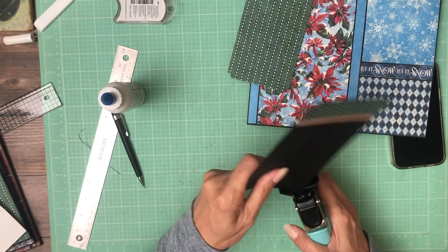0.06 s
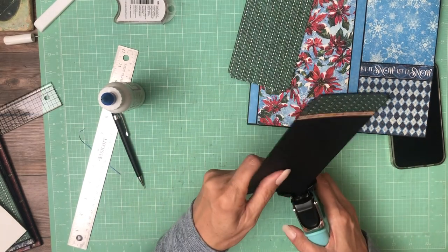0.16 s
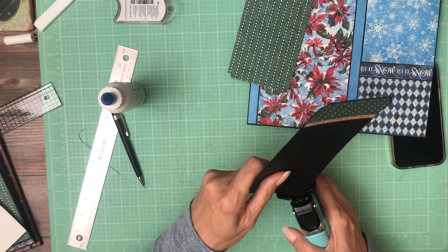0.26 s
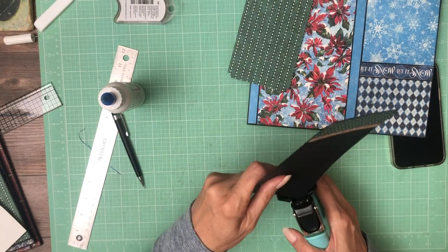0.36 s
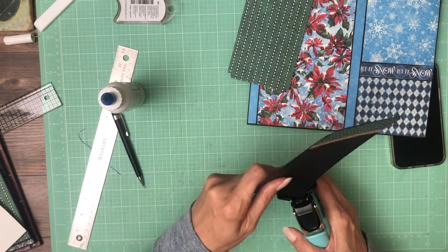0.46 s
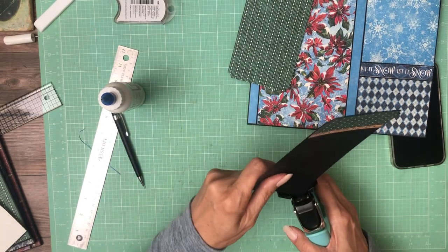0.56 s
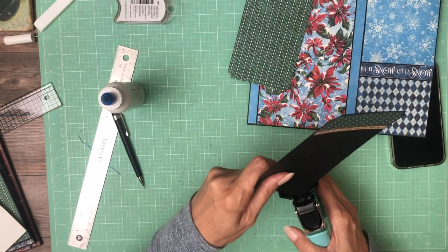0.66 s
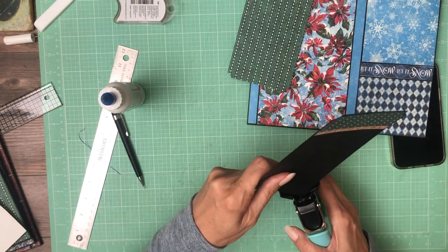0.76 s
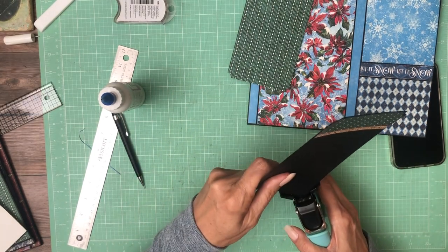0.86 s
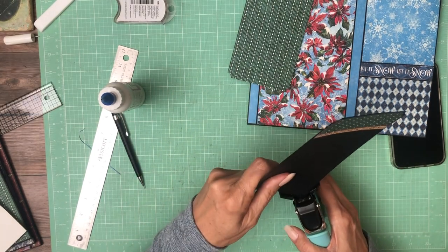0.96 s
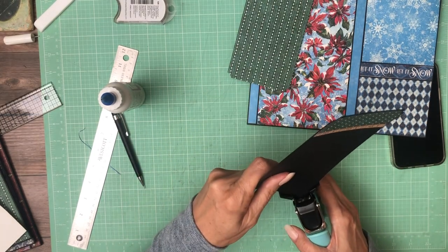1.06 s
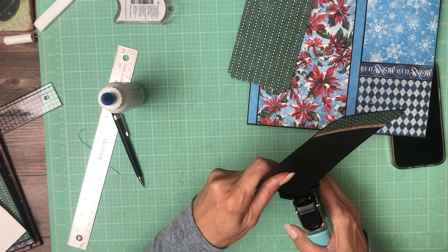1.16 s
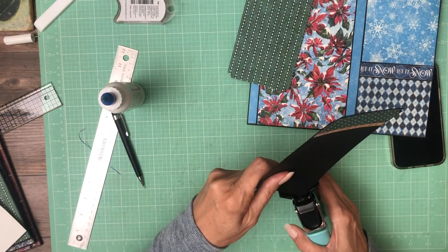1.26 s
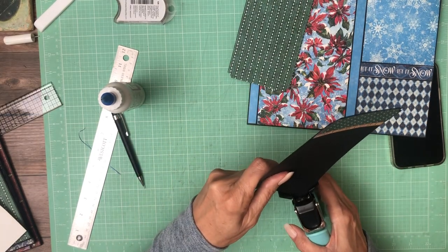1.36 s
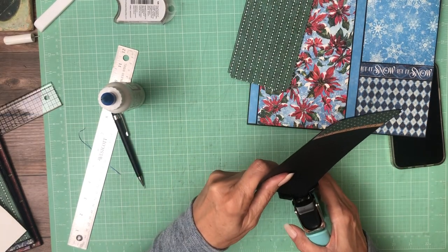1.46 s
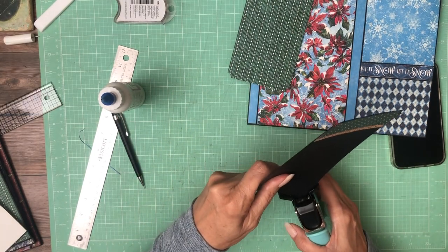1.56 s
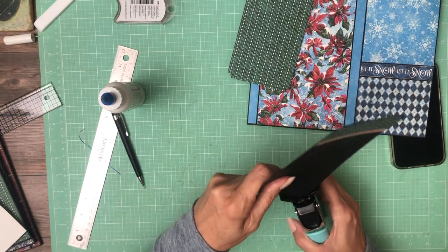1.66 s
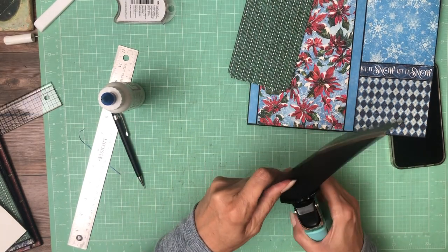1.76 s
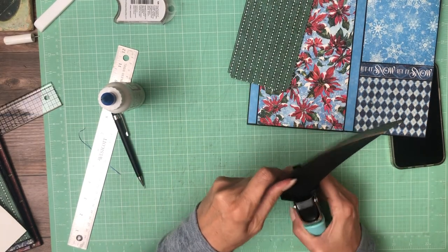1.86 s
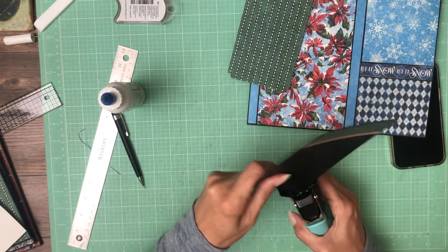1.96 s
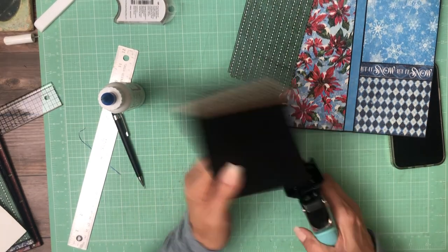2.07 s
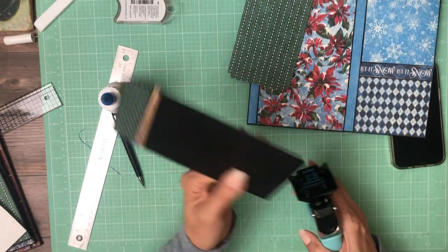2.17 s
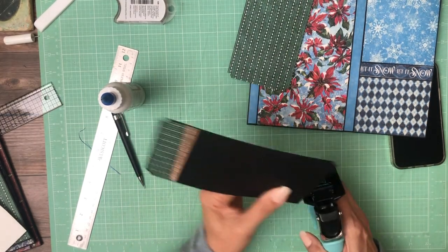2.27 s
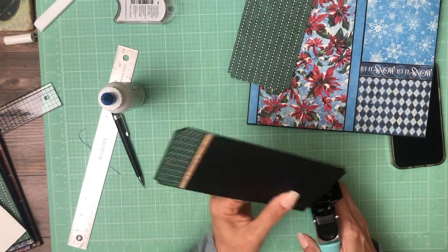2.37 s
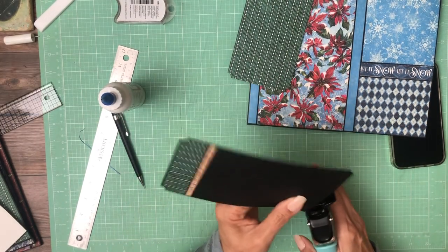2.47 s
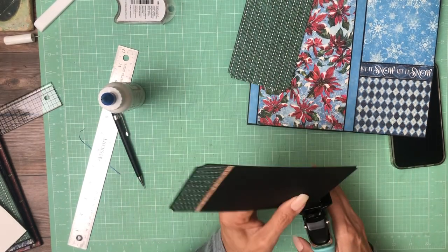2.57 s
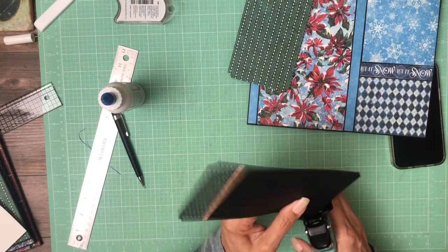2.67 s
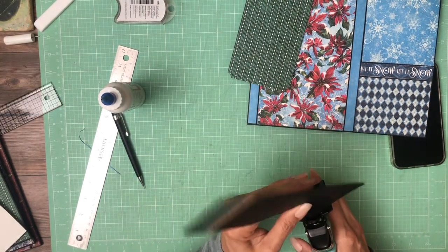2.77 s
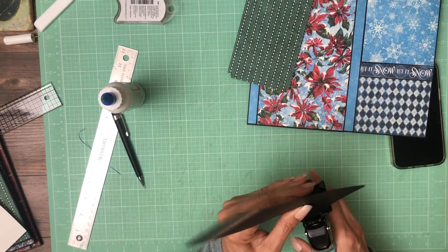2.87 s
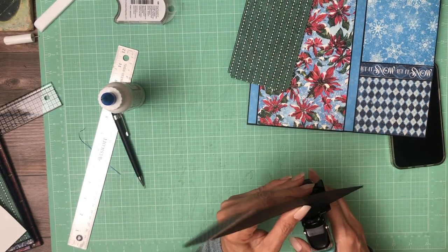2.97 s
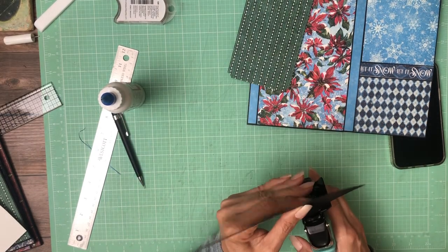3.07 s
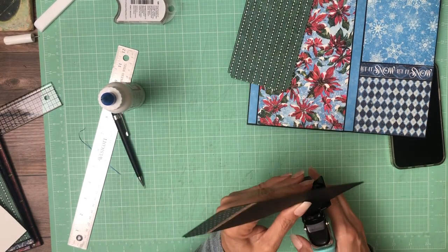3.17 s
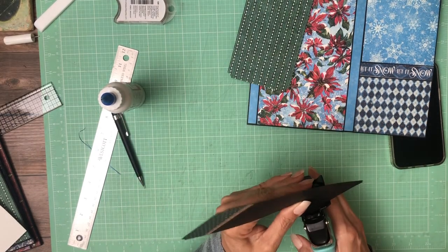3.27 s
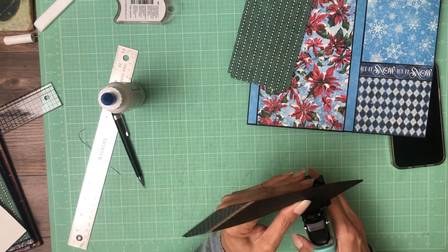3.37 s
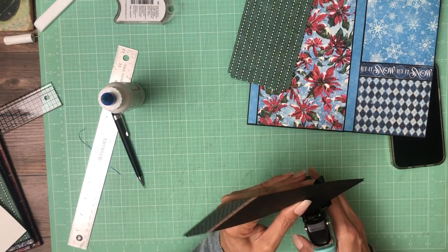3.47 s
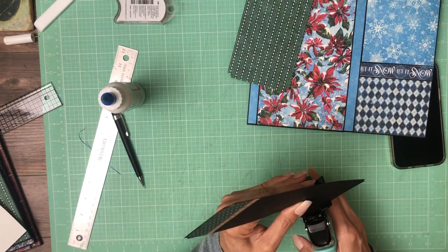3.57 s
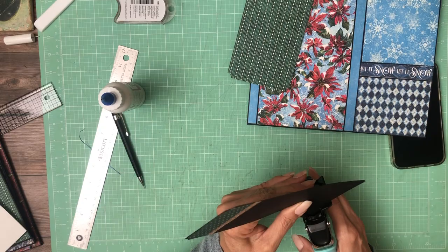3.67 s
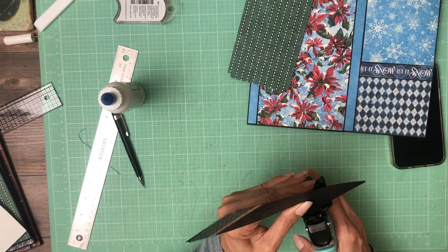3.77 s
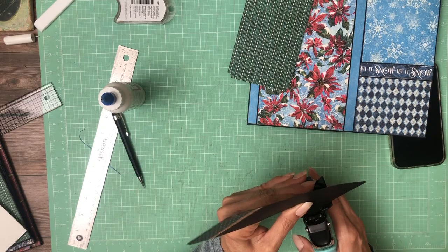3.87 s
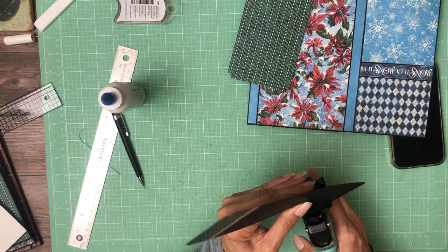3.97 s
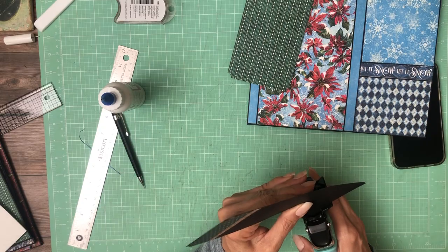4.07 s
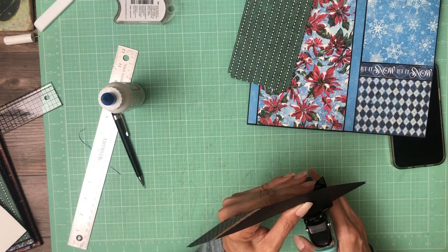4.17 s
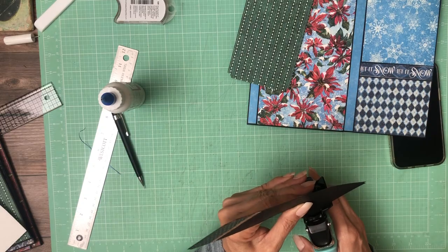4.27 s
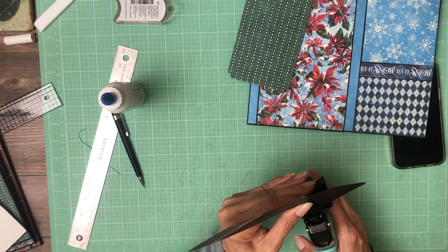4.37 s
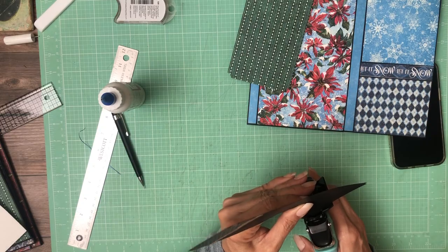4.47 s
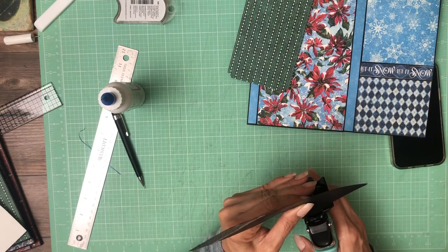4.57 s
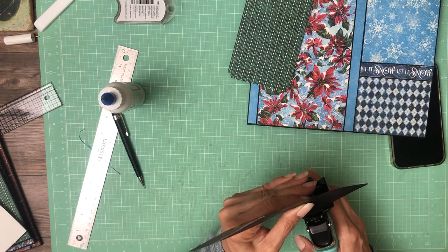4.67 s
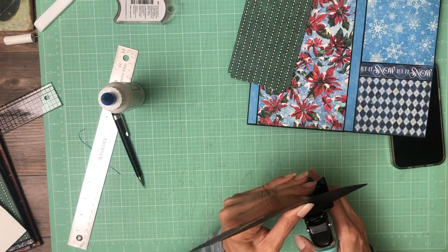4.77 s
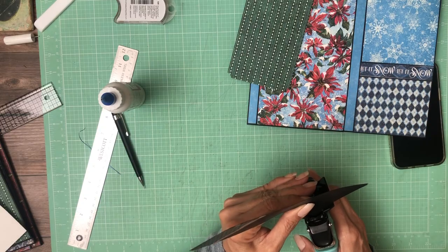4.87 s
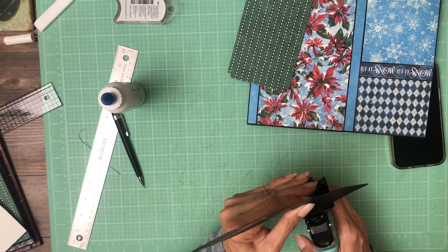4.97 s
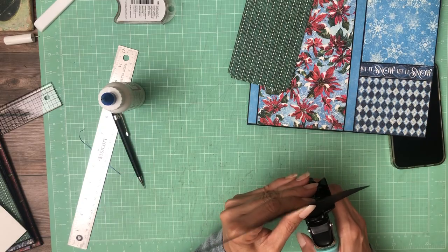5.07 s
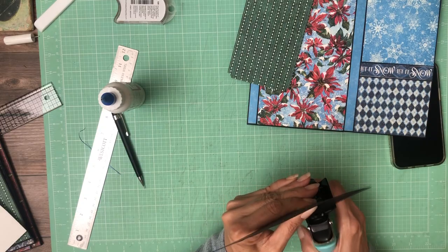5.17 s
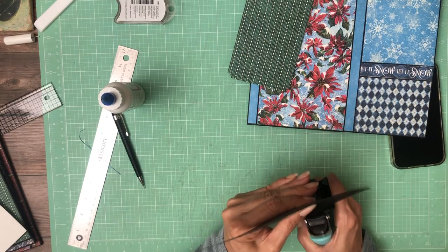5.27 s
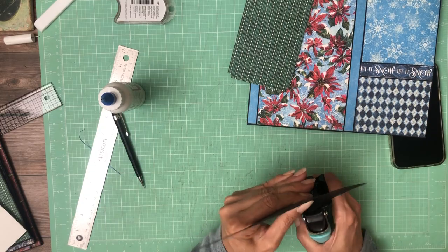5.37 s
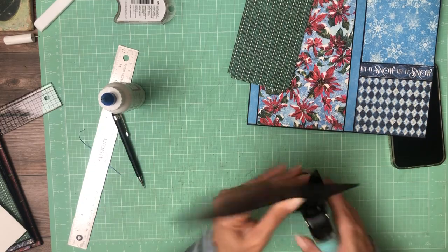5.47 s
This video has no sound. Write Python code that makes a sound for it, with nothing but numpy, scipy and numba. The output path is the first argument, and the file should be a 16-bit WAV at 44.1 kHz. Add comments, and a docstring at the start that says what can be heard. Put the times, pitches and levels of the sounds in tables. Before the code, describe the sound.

Close, dry sound at a craft desk. Faint ticks of a card edge in a metal slot, then a hand punch crunches through cardstock with a dull spring-back thud. The card scrapes and clicks as it is turned, near-silence follows, and a second, louder crunch ends it.

```python
"""A hand punch trims the corner of a stiff card in two squeezes: torn fibres, as random snaps, ring the jaws and hiss.
Jaws and card edge click as short rough contacts ringing metal resonances; the card scrapes in the slot as
filtered grain noise. Card and handle thud and flap as damped bending modes, over a short dull room tail
and a faint hush of shaped noise with a far motor's hum."""
import sys
import numpy as np
from scipy import signal
from scipy.fft import rfft, irfft, next_fast_len
from scipy.io import wavfile
from scipy.ndimage import uniform_filter1d
from numba import njit

SR = 44100
rng = np.random.default_rng(int(sys.argv[2]) if len(sys.argv) > 2 else 0)


def boost_factor(decibels):
    """Convert a level in decibels to a linear amplitude factor."""
    exponent = np.asarray(decibels, float) / 20
    return 10 ** exponent


def bounce(signal):
    """Save signal as a 16-bit WAV file at the path given by the first command-line argument."""
    frames = np.transpose(np.atleast_2d(signal))
    limited = np.clip(frames, -1, 1)
    pcm = np.round(limited * 32767).astype(np.int16)
    wavfile.write(sys.argv[1], SR, pcm)


N = 243431
T = np.arange(N) / SR

# jaw resonances: f/Hz, width/Hz, gain/dB
JAW_RINGS = [(1061, 53, -1.5), (1297, 68, -2), (1590, 90, 4), (2500, 210, 3), (2840, 340, 9),
             (3290, 150, -11), (4230, 410, -9), (6124, 900, -4)]
# slot resonances: f/Hz, width/Hz, gain/dB
SLOT_RINGS = [(1671, 150, 7.5), (2300, 590, -7.5), (3190, 220, 0), (3760, 130, 1.5), (4100, 160, -4.5),
              (5050, 140, 3.5), (6630, 410, -9), (7030, 102, 7), (7670, 169, -4), (9000, 400, -4.5)]


def level(x, db=0):
    """Scale to an rms level."""
    return x * boost_factor(db) / np.sqrt(np.mean(x ** 2))


def peak(x, db):
    """Scale to a peak level."""
    return x * boost_factor(db) / np.abs(x).max()


def add(out, start_s, sound):
    """Mix a sound in at a time."""
    i = int(start_s * SR)
    out[i:i + len(sound)] += sound[:N - i]


def band(x, lo_hz, hi_hz):
    """Steep fixed band-pass."""
    edges_hz = [lo_hz, min(hi_hz, 0.45 * SR)]
    return signal.sosfilt(signal.butter(3, edges_hz, "bandpass", fs=SR, output="sos"), x)


def colour(x, points):
    """Shape the spectrum by (f/Hz, gain/dB) points, interpolated over log frequency."""
    hz, db = np.transpose(points)
    n = next_fast_len(len(x))
    f_hz = np.maximum(np.arange(n // 2 + 1) * SR / n, 1)
    gain = boost_factor(np.interp(np.log(f_hz), np.log(hz), db))
    return irfft(rfft(x, n) * gain, n)[:len(x)]


def ring(x, modes):
    """Sum of fixed resonances with alternating sign."""
    out = 0
    for k, (hz, width_hz, db) in enumerate(modes):
        b, a = signal.iirpeak(hz, hz / width_hz, SR)
        out = out + (-1) ** k * boost_factor(db) * signal.lfilter(b, a, x)
    return out


@njit
def sweep(x, hz, share):
    """Band-pass whose centre moves; width is a share of the centre."""
    y, band_state, low_state = np.empty(len(x)), 0., 0.
    for i in range(len(x)):
        g = np.tan(np.pi * hz[i] / SR)
        v = (band_state + g * (x[i] - low_state)) / (1 + g * (g + share))
        band_state = 2 * v - band_state
        low_state += 2 * g * v
        y[i] = share * v
    return y


def walk(size):
    """Smooth random drift over about size samples; rms 1."""
    return level(uniform_filter1d(uniform_filter1d(rng.standard_normal(N), size), size))


def fibres(rate_hz, spread_db, patchy_db):
    """Fibres snap at random, in louder and softer patches of some ms; spread makes a few snap harder."""
    snaps = (rng.random(N) < rate_hz / SR) * rng.standard_normal(N)
    snaps = snaps * boost_factor(spread_db * rng.exponential(size=N))
    return level(snaps * boost_factor(patchy_db * np.tanh(walk(size=150))))


def curves(gestures):
    """Gate and columns over time; silent between separate gestures, bridged over short pauses."""
    on = np.zeros(N)
    s, *columns = np.vstack(gestures).T
    for rows in gestures:
        on[int(rows[0][0] * SR):int(rows[-1][0] * SR) + 450] = 1
    return uniform_filter1d(on, size=200), [np.interp(T, s, c) for c in columns]


def held(gestures, rows):
    """Columns of one row per gesture, held from the gesture's start."""
    starts_s = [gesture[0][0] for gesture in gestures]
    k = np.maximum(np.searchsorted(starts_s, T) - 1, 0)
    return np.array(rows, float).T[:, k].copy()


def contact(push_s, drag_db):
    """A short rough contact force, then the edge drags a little."""
    t = T[:4000]
    push = t / push_s * np.exp(-t / push_s)
    drag = boost_factor(drag_db) * np.exp(-t / 0.0072)
    return rng.standard_normal(4000) * (push + drag)


def favour(hz, spot_hz):
    """Gain in dB of a mode: 0 at the pitch the contact favours, down to -14 at 0.4 octave and beyond."""
    return -14 * np.minimum(np.abs(np.log2(hz / spot_hz)) / 0.4, 1)


def decay(modes, rise_s):
    """Damped sines (f/Hz, level/dB, t60/s) with a rounded start."""
    t = T[:SR // 2]
    sound = sum(boost_factor(db) * np.sin(2 * np.pi * hz * t) * 1000 ** (-t / t60_s) for hz, db, t60_s in modes)
    return sound * np.sin(np.pi / 2 * np.minimum(t / rise_s, 1)) ** 2


def cuts():
    """Tearing fibres ring the jaws, hiss into the air and shake the card."""
    # bite, shear and opening of each squeeze: t/s, level/dB, low jaw ring/dB re level, fibre hiss/dB re level
    phases = [
        [(1.69, -70.5, -8, -9.5), (1.724, -59.5, -4, -14.5), (1.728, -45.5, -34, -17), (1.763, -34.5, -29, -14),
         (1.769, -37.5, -23, -10.5), (1.773, -28.5, -26, -6.5), (1.8, -31, -13, -13), (1.819, -41.5, -3, -7.5)],
        [(1.822, -33, -5, -5.5), (1.828, -23.5, -11.5, -4), (1.86, -21.5, -6, -1), (1.94, -37.5, -3.5, -9),
         (1.957, -39.5, -21, -6.5)],
        [(1.966, -34.5, -13, -10), (1.977, -30.5, -20, -2), (1.99, -41, -1, -8.5), (2.007, -40.5, -16, -2),
         (2.016, -32.5, -9, -3), (2.032, -28.5, -13, -4), (2.046, -38, -15, 3), (2.058, -31, -12, -4),
         (2.09, -32.5, -15.5, -6), (2.125, -41.5, -13, -5)],
        [(5.14, -75.5, -8, -7.5), (5.176, -65, -14.5, -10), (5.202, -52, -21, -4), (5.206, -42, -14, -7.5),
         (5.234, -34.5, -23, -9.5), (5.244, -22, -25, -5), (5.264, -36.5, -31, -9)],
        [(5.27, -34, -14, -5), (5.28, -20, -9, -3), (5.308, -21, -3, -3), (5.345, -28, -10.5, -5.5),
         (5.37, -31.5, -4, -10), (5.404, -37.5, -30, -9.5), (5.429, -42.5, -12, -17)],
        [(5.441, -36, 0, -5), (5.447, -37.5, -10, -14), (5.46, -46.5, -6, -7), (5.466, -30, -11, -10),
         (5.474, -21.5, -13, 0), (5.48, -33, -2, -9.5), (5.493, -25, -3.5, -9), (5.52, -35.5, -4, -3.5)],
    ]
    # per phase: card boom/dB re low ring, creak of the two lowest jaw rings/dB
    loads = [(-8.5, -6.5), (-2, 3.5), (3, -4.5), (-4.5, -6.5), (-10, 4), (-4, -5.5)]
    # fibre hiss spectrum: f/Hz, gain/dB
    hiss_points = [(2060, -40), (3500, 3), (4210, -1.5), (5820, 5), (12500, -1.5), (13600, -1.5),
                   (16000, -13.5)]
    on, (db, low_db, hiss_db) = curves(phases)
    tear = fibres(14000, spread_db=3.0, patchy_db=0.5)
    boom_db, creak_db = held(phases, loads)
    low = boost_factor(creak_db) * ring(tear, JAW_RINGS[:2]) + ring(tear, JAW_RINGS[2:3])
    low = level(band(low, 950, 2100))
    body = level(ring(tear, JAW_RINGS[3:]) + boost_factor(1) * band(tear, 1500, 4900))
    fine_tear = fibres(16000, spread_db=2.0, patchy_db=3.0)
    hiss = level(colour(band(fine_tear, 4500, 15000), hiss_points))
    boom = level(band(rng.standard_normal(N), 220, 640))
    layers = boost_factor(low_db) * (low + boost_factor(boom_db) * boom) + body + boost_factor(hiss_db) * hiss
    return on * boost_factor(db) * layers


def clicks():
    """Sharp contacts ring the loaded jaws or the open slot, each with a crack of treble."""
    # jaws under load: t/s, peak/dB, low ring/dB re peak, treble/dB re peak, contact/ms
    jaw_hits = [(1.7729, -23.5, -14, -3, .6), (1.828, -17.5, -8.5, -13, .6), (1.9624, -18, -8, -16, .6),
                (1.9811, -29, 3, 1, .6), (2.0103, -31.5, -6.5, 18, .6), (2.0178, -25, -2, -3.5, .6),
                (2.0314, -21, -5.5, -1.5, .6), (5.244, -18, -5, -7.5, .6), (5.2697, -17.5, -8.5, -1, 0.66),
                (5.2771, -14, -13.5, -7.5, .6), (5.435, -11.5, -5, -8, 1.1), (5.4634, -11, -1, -14, 1.3),
                (5.4713, -14.5, -0.5, 0, 0.81)]
    # card edge in the open slot: t/s, peak/dB, favoured ring f/Hz, treble/dB re peak, contact/ms
    edge_ticks = [(0.1228, -32, 3900, -25, 1.3), (0.133, -34, 1800, -28, 0.96),
                  (0.144, -34, 3800, -28, 1.7), (0.218, -40, 3339, -26, 1.1), (0.2606, -32, 3600, -28, 1.3),
                  (0.2745, -32, 1790, -36, 0.76), (0.291, -28.5, 1673, -42, 3.7),
                  (0.3437, -32, 1880, -38.5, 1.1), (0.4346, -33.5, 2500, -34, 2.7),
                  (0.582, -49, 4000, -17, 8.7), (0.688, -43, 5050, -25.5, 5),
                  (1.703, -48, 1720, -16.5, 2.7), (1.73, -32, 4100, -18.5, 0.86),
                  (2.4215, -39.5, 1730, -26, 2.7), (2.4705, -52.5, 5200, -9.5, 2.7),
                  (2.5593, -38.5, 5040, -12.5, 1.47), (2.6646, -20, 2201, -21.5, 2.4),
                  (2.7251, -21.5, 1624, -19.5, 0.84), (2.759, -28.5, 3803, -28.5, 1.4),
                  (2.9704, -44.5, 1670, -32, 0.8), (2.926, -53.5, 2730, -2, 2.0),
                  (3.0677, -55.5, 2440, -10, 2.2), (3.1757, -49.5, 5160, -19, 1.5),
                  (3.4542, -36.5, 3290, -37.5, 1.34), (3.6681, -51, 4420, -32.5, 2.34),
                  (5.1016, -57, 1636, -23.5, 1.33), (5.155, -56, 2250, -18, 2.4),
                  (5.2048, -34, 3000, -7.5, 2)]
    body_db = -15  # re peak
    out = np.zeros(N)
    for s, db, low_db, treble_db, contact_ms in jaw_hits:
        hit = contact(contact_ms / 1000, -42)
        low = peak(ring(hit, JAW_RINGS[2:3]), db + low_db)
        rings = peak(ring(hit, JAW_RINGS[3:5]), db)
        treble = peak(band(hit, 3600, 20000), db + treble_db)
        add(out, s, low + rings + treble)
    for s, db, spot_hz, treble_db, contact_ms in edge_ticks:
        hit = contact(contact_ms / 1000, -20)
        modes = [(hz, width_hz, d + favour(hz, spot_hz)) for hz, width_hz, d in SLOT_RINGS[:7]]
        rings = peak(ring(hit, modes), db)
        body = peak(band(hit, 230, 1100), db + body_db)
        treble = peak(band(hit, 5800, 17000), db + treble_db)
        add(out, s, rings + body + treble)
    return out


def slides():
    """Card grain drags over metal: a broad rub, slot rings near its centre, hiss, air and the sheet's boom."""
    # card in the slot and under the fingers, one curve per move: t/s, level/dB
    moves = [
        [(0.0, -61.5), (0.025, -69), (0.096, -50), (0.13, -48), (0.18, -58), (0.2, -71), (0.224, -49),
         (0.25, -61.5)],
        [(0.254, -71), (0.264, -49), (0.273, -64), (0.283, -44.5), (0.303, -50.5), (0.338, -58), (0.353, -60.5),
         (0.4, -83)],
        [(2.125, -45.5), (2.17, -34.5), (2.22, -38.5), (2.283, -40.5), (2.297, -50), (2.319, -52),
         (2.333, -56.5), (2.41, -72.5)],
        [(2.41, -68), (2.475, -66.5), (2.51, -76.5), (2.54, -61), (2.575, -65), (2.595, -51), (2.645, -46)],
        [(2.648, -51.5), (2.666, -36), (2.68, -41.5), (2.705, -42), (2.722, -41), (2.733, -44.5),
         (2.755, -68.5), (2.768, -46.5), (2.787, -62.5), (2.85, -73.5)],
        [(2.9, -69), (2.93, -71.5), (2.95, -73), (2.972, -64.5), (3.0, -71.5)],
        [(3.15, -81), (3.178, -73), (3.21, -93.5)],
        [(3.224, -87), (3.232, -56), (3.262, -48), (3.33, -87.5)],
        [(3.93, -95), (3.95, -69.5), (4.0, -88)],
    ]
    # grip per move: rub centre f/Hz, low ring f/Hz, then low ring, hiss, air, sheet boom/dB re level
    grips = [(4350, 1800, -3, -30, -22.5, 0), (3730, 1790, 3.5, -32, -33.5, -1),
             (4650, 1890, -13.5, -5, -5.5, -10), (5040, 1550, -14, -16, -13.5, -11.5),
             (4103, 2000, -2.5, -8, -16.5, -9), (3300, 1200, 4, -10, -15.5, -11.5),
             (5200, 1610, 6, -14, -18.5, 9), (3670, 2250, 6, -2, -21.5, -9), (4030, 1715, 0, -12, -16, -15)]
    ring_swing_db = 11
    on, (db,) = curves(moves)
    rub_hz, low_hz, low_db, hiss_db, air_db, boom_db = held(moves, grips)
    drag = fibres(9000, spread_db=1.0, patchy_db=3.0)
    rub = level(sweep(sweep(drag, rub_hz, 0.57), rub_hz, 0.57))
    # each ring comes and goes as the edge touches other spots
    rings = np.zeros(N)
    for mode in SLOT_RINGS[2:7]:
        swing_db = ring_swing_db * np.tanh(walk(size=500))
        rings += boost_factor(favour(mode[0], rub_hz) + swing_db) * ring(drag, [mode])
    high_rings = sum(boost_factor(2.7 * walk(size=900)) * ring(drag, [mode]) for mode in SLOT_RINGS[7:])
    low = level(sweep(sweep(drag, low_hz, 0.091), low_hz, 0.15)) * boost_factor(1.9 * walk(size=400))
    low = low + level(band(drag, 1577, 2600), 0.5)
    hiss = level(band(drag, 6600, 9200)) + level(high_rings, -1.5)
    air = band(fibres(12000, spread_db=0.0, patchy_db=6.5), 10000, 16500)
    push = rng.standard_normal(N) * boost_factor(1.4 * walk(size=500))
    boom = level(band(push, 213, 540)) + level(band(push, 890, 1240), -12.5)
    layers = level(rub + level(rings, -3.0))
    layers = layers + boost_factor(low_db) * level(low) + boost_factor(boom_db) * level(boom)
    layers = layers + boost_factor(hiss_db) * level(hiss) + boost_factor(air_db) * level(air)
    return on * boost_factor(db) * layers


def flaps():
    """Soft pushes set bending modes going as the card flaps, the handle springs back and the sheet fans the air."""
    # card flaps and handle spring-back: t/s, level/dB, pitch f/Hz, upper rings/dB
    jolts = [(1.782, -35, 512, -27), (1.984, -28.5, 535, -25), (2.021, -15.5, 220.6, -26),
             (2.044, -20, 189, -30), (2.061, -20.5, 181, -25), (2.123, -17.5, 423, -3),
             (2.21, -26.5, 376, -45), (2.238, -27, 449, -29), (2.357, -32, 433, -32),
             (2.369, -32, 452, -35), (2.42, -21, 433, -21), (2.666, -36.5, 269, -26),
             (5.248, -33.5, 538, -35), (5.472, -13, 211, -22), (5.495, -19, 180, -15)]
    # bending modes: multiple of pitch, level/dB, share of base t60
    bending = [(1, 5, 0.81), (.66, -4.5, 0.98), (1.4, -7.5, 1.4)]
    # upper rings: f/Hz, level/dB, t60/s
    upper = [(873, 0, 0.081), (1160, 5, 0.033), (1730, -15.5, 0.045)]
    # whole sheet fanning the air after a jolt: t/s, level/dB
    fan_jolts = [(1.841, -49), (2.049, -35.5), (2.092, -43.5), (2.254, -51), (2.419, -54.5)]
    base_t60_s = 0.066
    fan_hz, fan_scatter, fan_t60_s = 104.6, 0.07, 0.77
    out = np.zeros(N)
    for s, db, hz, upper_db in jolts:
        modes = [(hz * m, d, base_t60_s * share) for m, d, share in bending]
        modes += [(f_hz, d + upper_db, t60_s) for f_hz, d, t60_s in upper]
        add(out, s, boost_factor(db) * decay(modes, 1.4 / hz))
    for s, db in fan_jolts:
        hz = fan_hz * (1 + fan_scatter * rng.standard_normal())
        add(out, s, decay([(hz, db, fan_t60_s)], 0.0074))
    return out * (1 + 0.25 * walk(size=120))


def hush():
    """Steady shaped room noise, with narrow-band noise as a faint wavering hum."""
    # room noise spectrum: f/Hz, gain/dB
    room_points = [(18, -62.5), (30, -28), (79, -16), (103, -4), (295, -6.5), (355, -8), (526, -9),
                   (616, -13), (844, -13), (1630, -24), (3310, -26.5), (8980, -33), (16000, -43.5)]
    # faint far motor: t/s, level/dB
    motor = [(3.298, -98.5), (3.7, -76), (5.2, -76.5)]
    room_db, hum_hz = -67, 159
    s, db = np.transpose(motor)
    hum = level(band(rng.standard_normal(N), hum_hz - 3, hum_hz + 3)) * boost_factor(np.interp(T, s, db))
    return level(colour(rng.standard_normal(N), room_points), room_db) + hum


def room(near):
    """Short dull tail: convolution with decaying band-limited noise."""
    t60_s, tail_db = 0.2, -16
    t = T[:SR // 2]
    tail = band(rng.standard_normal(len(t)), 120, 6900) * 1000 ** (-t / t60_s) * (t > 0.004)
    tail = tail * boost_factor(tail_db) / np.sqrt(np.sum(tail ** 2))
    return signal.fftconvolve(near, tail)[:N]


def scene():
    """Everything at the desk, its room tail and the hush; one channel."""
    near = cuts() + slides() + clicks() + flaps()
    return (near + room(near) + hush())[None]


def top_cut(x):
    """Nothing passes above the cut-off."""
    return signal.sosfilt(signal.butter(12, 16680, fs=SR, output="sos"), x)


def record(dry):
    """The microphone cuts the deep bass below 60 Hz."""
    mix = signal.sosfilt(signal.butter(4, 60, "highpass", fs=SR, output="sos"), dry)
    return top_cut(mix)


dry = scene()
out = record(dry)
bounce(out)
```